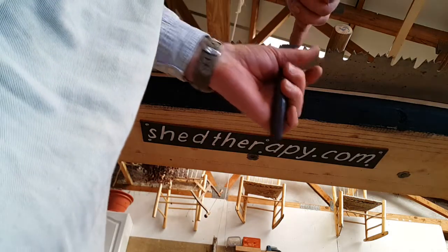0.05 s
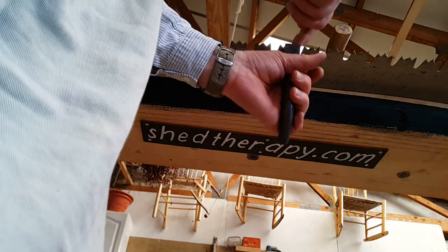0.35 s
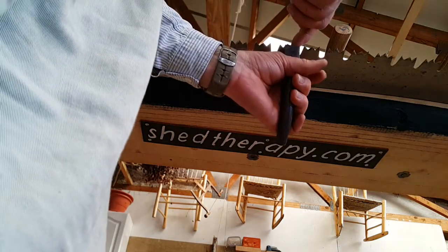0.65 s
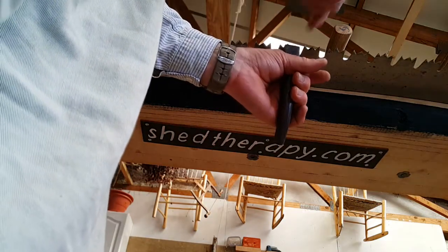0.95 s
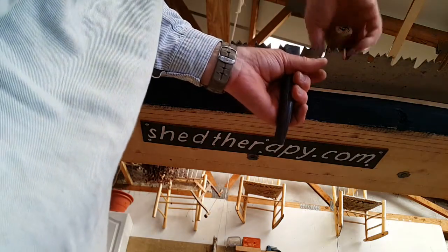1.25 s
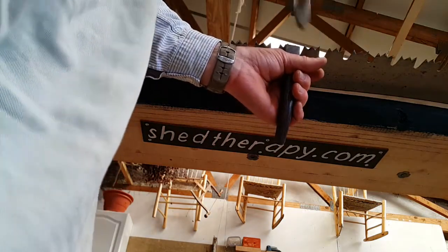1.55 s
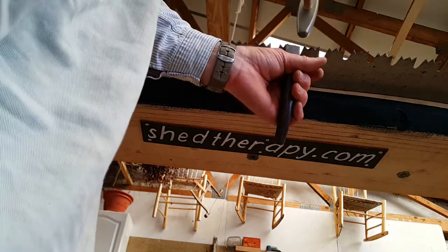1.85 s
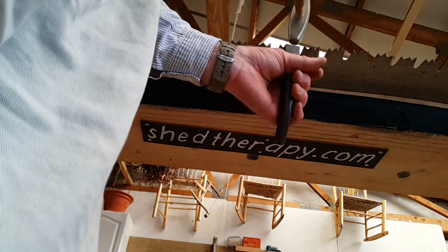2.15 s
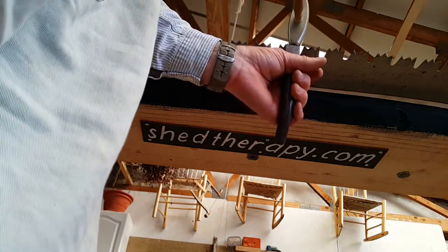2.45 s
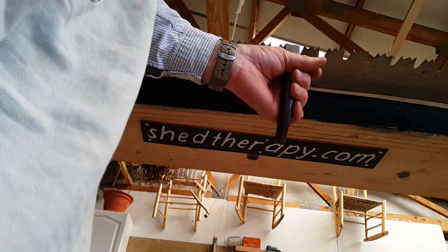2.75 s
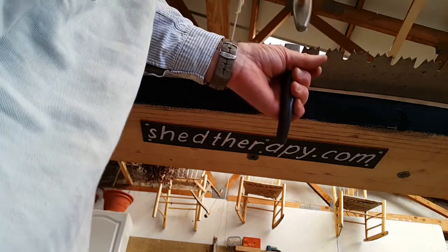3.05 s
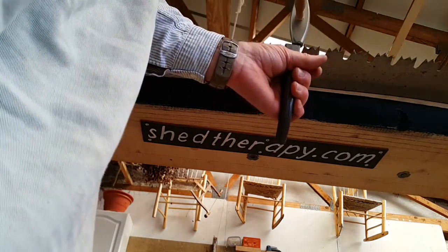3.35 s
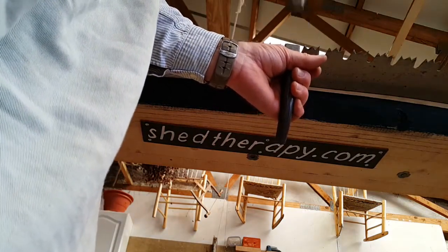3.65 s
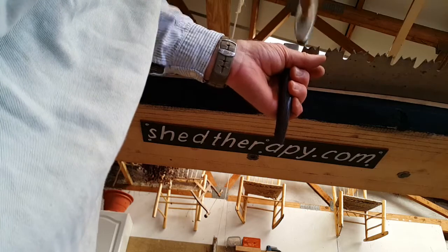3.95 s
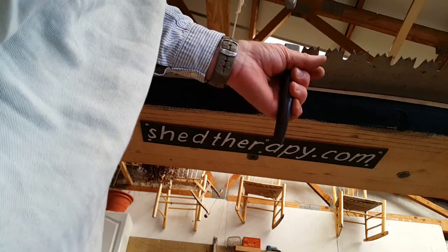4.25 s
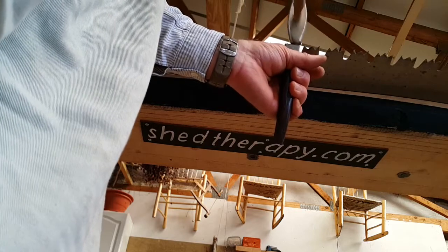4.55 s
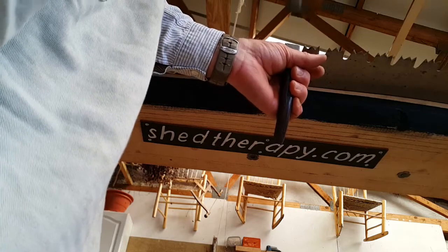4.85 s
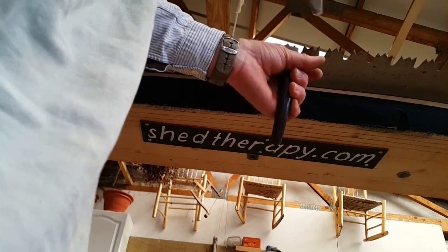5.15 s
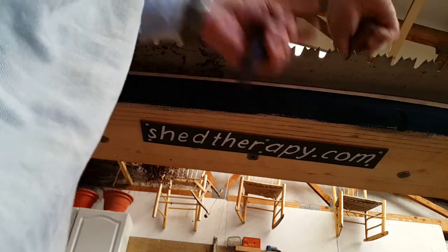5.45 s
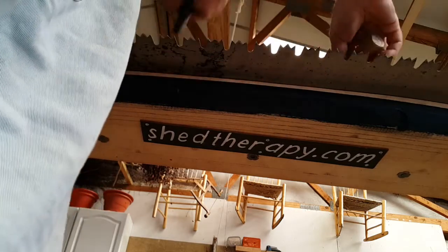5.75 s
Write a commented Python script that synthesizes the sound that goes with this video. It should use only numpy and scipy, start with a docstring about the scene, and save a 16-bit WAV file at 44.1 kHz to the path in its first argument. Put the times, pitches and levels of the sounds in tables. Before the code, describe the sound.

In a wooden shed, a few light clicks and knocks come from a big saw blade clamped in a wooden vice. A small hammer then strikes its teeth six times, about twice a second, each a sharp clack with a brief steel ping and a low knock. Finally an iron tool clonks onto a plank. The sound is close, with a short room echo and a faint outdoor hush.

```python
"""In a shed, the teeth of a big saw are being set (bent sideways) in a wooden vice. An iron is held
behind the blade while a small hammer feels for a tooth, then strikes and bounces: the blade clacks,
the steel pings, the vice knocks and the bench thuds. At the end the iron is put down on a plank.
The rafters answer; a sleeve rustles and a far dove coos over the outdoor air. The first hard blow
makes the microphone's automatic volume control turn everything down."""
import sys
import numpy as np
from scipy import signal
from scipy.fft import rfft, irfft, next_fast_len
from scipy.io import wavfile
from scipy.ndimage import uniform_filter1d, minimum_filter1d

SR = 44100
rng = np.random.default_rng(int(sys.argv[2]) if len(sys.argv) > 2 else 0)


def generate_wav(signal):
    """Clip the signal to [-1, 1] and save it as 16-bit WAV at the path in sys.argv[1]."""
    frames = np.transpose(np.atleast_2d(signal))
    scaled = np.clip(frames, -1, 1) * 32767
    pcm = np.round(scaled).astype(np.int16)
    wavfile.write(sys.argv[1], SR, pcm)


N = 260631
T = np.arange(SR // 2) / SR  # seconds since a short sound began

# fingers and hammer feel for a tooth: t/s, clack level/dB, brightness f/Hz, knock level/dB
LIGHT_TOUCHES = [(0.4538, -6, 6960, 6.5), (0.6099, -11.5, 2780, 5.5), (1.274, -16, 1980, -10),
                 (1.372, -14, 1500, 8.5), (1.393, -18.5, 7200, 7.5), (1.539, -13, 930, 10),
                 (1.551, -10.5, 1180, 2.5)]
# the hammer strikes and bounces once: t/s, force level/dB, brightness f/Hz, ping level/dB,
# thud level/dB, wait for the bounce t/s, bounce level/dB compared with the blow
HAMMER_BLOWS = [(2.477, 15, 2500, 2.5, -4.5, 0.016, -19.5), (3.0428, 37, 15000, 45, 38.5, 0.0475, -10),
                (3.445, 16.5, 4200, 25.5, 6.5, 0.026, -17), (4.066, 30, 9000, 40.5, 13, 0.036, -3.5),
                (4.6167, 25, 7640, 26.5, 4, 0.023, -14), (5.0756, 31, 12520, 40, 32.5, 0.0412, -8)]
# how much louder the saw is on the left than on the right: f/Hz, level/dB
SAW_BALANCE = [(100, 1), (300, 1.5), (1000, -3.5), (2200, 2), (4300, -4), (8000, -3.5), (13000, -1.5)]
def hammer_on_saw():
    """Light touches, then bouncing blows: with more force the steel clack outgrows the wooden knock."""
    out = np.zeros((2, N))
    firm_force_db, firm_knock_db = 30, 26.5
    knock_at = lambda force_db: firm_knock_db + 0.5 * (force_db - firm_force_db)
    for s, clack_db, bright_hz, knock_db in LIGHT_TOUCHES:
        add(out, s, contact(clack_db, bright_hz, knock_db))
    for s, force_db, bright_hz, ping_db, thud_db, wait, bounce_db in HAMMER_BLOWS:
        add(out, s, contact(force_db, bright_hz, knock_at(force_db), ping_db, thud_db))
        # the loose bounce only grazes the tooth's tip; it rings less and rocks the vice more
        back_db = force_db + bounce_db
        bounce = contact(back_db, bright_hz=11100, knock_db=knock_at(back_db) + 8.5,
                         ping_db=ping_db + bounce_db - 8.5, thud_db=thud_db + bounce_db - 9)
        add(out, s + wait, bounce)
    return filtered(out, lambda hz: amp(along(SAW_BALANCE, hz) * np.array([[.5], [-.5]])))


def contact(clack_db, bright_hz, knock_db, ping_db=-120, thud_db=-120):
    """One touch or hit on the saw. A softer contact lasts longer, so it leaves out the high notes."""
    soften = lambda hz: 1 / np.sqrt(1 + (hz / bright_hz) ** 4)
    clack = amp(clack_db) * blade_clack(soften)
    ping = amp(ping_db) * steel_ping(soften)
    knock = amp(knock_db) * vice_knock(soften)
    thud = amp(thud_db) * bench_thud()
    shed_share = 0.61  # the ping beams toward the listener, so only part of it fills the shed
    out = in_shed(clack + knock + thud + shed_share * ping, wet_db=-2.5)
    add(out, 0, (1 - shed_share) * ping)
    return out


# the tone colour of the blade's clack: f/Hz, level/dB
CLACK_COLOUR = [(60, -11.5), (250, -16.5), (600, -5.5), (900, -3.5), (1200, -4.5), (2100, -2), (3200, -5.5),
                (4500, -8), (6500, -0.5), (7500, -16.5), (8600, -8), (11000, -6.5), (13000, -11),
                (16000, -13)]
def blade_clack(soften):
    """The clamped blade shakes in countless ways at once and soon stops."""
    shake = amp(-0.5) * burst(t60=0.013) + amp(-3.0) * burst(t60=0.1)
    return struck(shake, lambda hz: amp(along(CLACK_COLOUR, hz)) * soften(hz))


# the notes of the hammer head and iron: f/Hz, level/dB, fade t/s
STEEL_NOTES = [(4236, 4, 0.05), (4378, 5, 0.045), (5530, -7, 0.08), (6465, -4, 0.05), (1875, -16, 0.02),
               (3490, -13.5, 0.04), (4560, -9, .025), (5680, -10, 0.04), (5950, -8, .04),
               (8480, -14, 0.025), (10500, -16, 0.015), (11630, -18, 0.015), (15240, -19, .08)]
def steel_ping(soften):
    """Hammer and iron ring; a soft hit dulls this more than any other part."""
    return struck(ring(STEEL_NOTES, scatter_db=3, spread=1.0), lambda hz: soften(hz) ** 2)


# the notes of the wooden vice with the blade in it: f/Hz, level/dB, fade t/s
VICE_NOTES = [(109.5, -5, 0.9), (160, -21.5, 0.068), (239.6, -2.5, 0.51), (273, -0.5, 0.16),
              (333.7, 3, 0.052), (355, -7, 0.36), (414, -14, .1), (497, -8, 0.053), (880, -10.5, .04),
              (1320, -19, 0.01)]
def vice_knock(soften):
    """The heavy vice takes a moment to get moving, then rings low."""
    onset = 1 - np.exp(-T / 0.00047)
    return struck(ring(VICE_NOTES, scatter_db=0, spread=0.5) * onset, soften)


# the tone colour of the bench's thud: f/Hz, level/dB
THUD_COLOUR = [(25, -28), (60, -2.5), (130, 4.5), (280, 6), (500, -13), (850, -0.5), (1300, -23.5),
               (4000, -42)]
def bench_thud():
    """A blow jolts the bench; the jolt arrives later and weaker on the left."""
    left_db, left_lag_s = -6, 0.0018
    jolt = T == 0
    left = amp(left_db) * np.roll(jolt, round(left_lag_s * SR))
    return struck(np.array([left, jolt], float), lambda hz: amp(along(THUD_COLOUR, hz)))


# the notes of the blade's free length: f/Hz, level/dB, fade t/s
BLADE_NOTES = [(1140, -10, 0.7), (1418, 0, 0.3), (2062, -6, 1.4), (2300, -7, 0.12)]
def blade_song():
    """The blade sings on faintly, about equally each time, as harder blows come with a firmer grip."""
    out = np.zeros((2, N))
    fade_out = np.minimum((T[-1] - T) / 0.042, 1)
    for s, *_ in HAMMER_BLOWS:
        add(out, s, amp(25) * ring(BLADE_NOTES, scatter_db=1.5, spread=0.22) * fade_out)
    return out


# steel slides over a tooth's tip: t/s, level/dB, f/Hz, length t/s
TOOTH_RUBS = [(0.752, -66, 6070, 0.066), (1.15, -67, 6150, 0.021), (1.368, -55.5, 6070, 0.012),
              (1.521, -67, 6100, 0.11), (2.482, -37, 6200, 0.0037), (2.695, -53, 3950, 0.012)]
def tooth_tinkles():
    """Light rubbing makes a tooth ring in one narrow band of pitch."""
    out = np.zeros((2, N))
    half_width_hz = 220
    for s, db, pitch_hz, length in TOOTH_RUBS:
        tone = noise(len(T), lambda hz: 1 / (1 + ((hz - pitch_hz) / half_width_hz) ** 2))
        age = 3 * T / length
        swell = age * np.exp(1 - age)
        add(out, s, in_shed(amp(db) * tone * swell, wet_db=-6))
    return out


# the iron lands and rocks: t/s, level/dB
IRON_BUMPS = [(5.6025, 37.5), (5.6075, 37), (5.6175, 30), (5.6275, 21.5)]
# the tone colour of the plank's clonk: f/Hz, level/dB
PLANK_COLOUR = [(40, -34.5), (110, -10.5), (170, -18), (250, -7), (400, -5.5), (550, -9.5), (850, -9.5),
                (980, -8), (1120, -22.5), (1400, -20.5), (2100, -20.5), (3500, -28), (6200, -31),
                (8000, -46.5), (15000, -60.5)]
# the plank's hollow notes: f/Hz, level/dB, fade t/s
HOLLOW_NOTES = [(897, -2, 0.021), (990, -5.5, 0.03)]
def iron_on_plank():
    """The iron clonks on a hollow plank and rocks to rest."""
    out = np.zeros((2, N))
    onset = 1 - np.exp(-T / 0.00024)
    for s, db in IRON_BUMPS:
        tap = 0.62 * (T == 0) + 0.51 * burst(t60=0.018)
        clonk = struck(tap, lambda hz: amp(along(PLANK_COLOUR, hz)))
        note = ring(HOLLOW_NOTES, scatter_db=4.5, spread=0.39) * onset
        add(out, s, in_shed(amp(db) * (clonk + note), wet_db=-2.0))
    return out


# how long the shed's echo takes to fall by 60 dB: f/Hz, fade t/s
ECHO_FADE = [(60, 0.23), (150, 1), (350, 0.45), (700, 0.6), (2000, 0.7), (4000, 0.66), (6000, 0.54),
             (8000, .45), (15000, 0.52)]
# the tone colour of that echo: f/Hz, level/dB
ECHO_COLOUR = [(60, -9.5), (150, -6), (330, 3.5), (900, -1), (2500, -2), (6000, -5), (14000, -11)]
def in_shed(x, wet_db):
    """A sound plus the shed's echo (wet_db sets its level), which builds fast and then dies away."""
    hz, t, hiss = signal.stft(stereo_noise(SR), SR, nperseg=256)
    t60 = along(ECHO_FADE, hz)[:, None]
    fade = amp(along(ECHO_COLOUR, hz)[:, None] - 60 * t / t60)
    even_energy = np.sqrt(2 * np.log(1000) / (t60 * SR))  # a longer fade adds no energy
    tail = signal.istft(hiss * fade * even_energy, SR, nperseg=256)[1][:, :SR]
    onset = 1 - np.exp(-np.arange(SR) / SR / 0.0059)
    out = amp(wet_db) * signal.fftconvolve(x, tail * onset, axes=1)
    add(out, 0, x)
    return out


# moves of the arm: middle t/s, level/dB, length t/s
ARM_MOVES = [(0.04, -69.5, 0.095), (0.216, -69.5, 0.21), (0.768, -62.5, 0.082), (1.26, -63.5, 0.18),
             (1.56, -67.5, 0.28), (1.725, -67, 0.16)]
# the tone colour of brushing cloth: f/Hz, level/dB
CLOTH_COLOUR = [(500, 4), (1500, -1), (3500, -2), (6000, -4), (8000, -16), (15000, -12)]
def sleeve():
    """Cloth noise swells and fades with each move of the arm."""
    t = np.arange(N) / SR
    swell = sum(amp(db) * np.exp(-2 * ((t - s) / length) ** 2) for s, db, length in ARM_MOVES)
    return swell * noise(N, lambda hz: amp(along(CLOTH_COLOUR, hz)))


# a far dove's calls: t/s, length t/s, level/dB
DOVE_COOS = [(2.25, 0.28, -59.5), (2.84, 0.28, -65)]
def dove():
    """Each coo is a pure tone whose pitch and level rise and fall together."""
    out = np.zeros((2, N))
    start_hz, rise_hz = 425, 89.5
    for s, length, db in DOVE_COOS:
        arch = np.sin(np.pi * np.minimum(T / length, 1))
        tone = np.sin(2 * np.pi * np.cumsum(start_hz + rise_hz * arch) / SR)
        add(out, s, amp(db) * arch * tone[None])
    return out


# the tone colour of the outdoor air: f/Hz, level/dB
AIR_COLOUR = [(15, -33.5), (25, -11), (70, -2.5), (166, -13), (212, -4), (277, -20), (309, -9.5),
              (463, -14.5), (714, -21.5), (863, -21), (962, -27.5), (1100, -26), (2610, -33), (3250, -33.5),
              (16000, -37)]
# how its low rumble rises and falls: t/s, level/dB
RUMBLE_LEVELS = [(0, 3), (0.9, 3.5), (1.5, -4.5), (3, 2.5)]
def outdoor_air():
    """A faint, steady hush whose rumble eases off and comes back."""
    air = amp(-59.5) * noise(N, lambda hz: amp(along(AIR_COLOUR, hz)))
    rumble_below_hz = 180
    rumble = filtered(air, lambda hz: 1 / (1 + (hz / rumble_below_hz) ** 4))
    rumble_db = np.interp(np.arange(N) / SR, *np.transpose(RUMBLE_LEVELS))
    return air - rumble + amp(rumble_db) * rumble


# how alike the left and right sides are: f/Hz, likeness (1 = the same)
SIDES_ALIKE = [(60, 0.31), (150, 1), (400, 0.8), (1500, 0.16), (4000, 0.37), (14000, 0.58)]
def stereo_noise(n):
    """An even hiss for two ears, most alike in the bass."""
    def shares(hz):
        angle = np.arccos(np.clip(along(SIDES_ALIKE, hz), -1, 1)) / 2
        return np.array([np.cos(angle), np.sin(angle)])
    mid, side = filtered(rng.standard_normal((2, n)), shares)
    return np.array([mid + side, mid - side])


def noise(n, colour):
    """Hiss with the given tone colour, at strength 1."""
    return unit(filtered(stereo_noise(n), colour))


def burst(t60):
    """Countless close notes fading together, by 60 dB in t60 seconds."""
    return unit(stereo_noise(len(T)) * amp(-60 * T / t60)) / np.sqrt(len(T))


def ring(notes, scatter_db, spread):
    """Notes that fall 60 dB in their fade time; spread puts left and right out of step."""
    hz, db, t60 = np.transpose(notes)[:, :, None]
    rate = np.log(1000) / t60
    size = 2 * rate / SR * amp(db + scatter_db * rng.standard_normal(hz.shape))
    phase = spread * rng.standard_normal((2,) + hz.shape)
    return (size * np.exp(-rate * T) * np.sin(2 * np.pi * hz * T + phase)).sum(axis=1)


def struck(x, colour, size=4096):
    """Give x a tone colour so that nothing sounds before the hit (a minimum-phase filter)."""
    gain = np.maximum(colour(np.fft.rfftfreq(size, 1 / SR)), 1e-6)
    cepstrum = irfft(np.log(gain))
    # move the part before the hit to after it
    cepstrum[1:size // 2] *= 2
    cepstrum[size // 2 + 1:] = 0
    response = irfft(np.exp(rfft(cepstrum)))
    return signal.fftconvolve(x, response[None], axes=1)[:, :x.shape[1]]


def filtered(x, response):
    """Multiply each frequency in x by response(hz)."""
    n = x.shape[-1]
    padded = next_fast_len(n + SR // 8)
    return irfft(rfft(x, padded) * response(np.fft.rfftfreq(padded, 1 / SR)), padded)[..., :n]


def along(points, hz):
    """Read between a table's rows on a pitch (log) scale."""
    row_hz, values = np.transpose(points)
    return np.interp(np.log(hz + 1), np.log(row_hz), values)


def amp(db):
    """Turn decibels into a multiplier."""
    return 10 ** (np.asarray(db) / 20)


def unit(x):
    """Scale x to an average strength (rms) of 1."""
    return x / np.sqrt(np.mean(x ** 2) + 1e-20)


def add(track, s, x):
    """Mix x into the track at s seconds."""
    part = track[:, round(s * SR):][:, :x.shape[1]]
    part += x[:, :part.shape[1]]


def scene():
    """The work lies a little to the right, so the sound reaches the left side later."""
    work = hammer_on_saw() + blade_song() + tooth_tinkles() + iron_on_plank()
    background = outdoor_air() + sleeve() + dove()
    lag_s = np.array([[0.00006], [0]])  # left, right
    return filtered(work + background, lambda hz: np.exp(-2j * np.pi * hz * lag_s))


def record(dry):
    """The volume control drops on a loud peak, sinks a little further and stays down."""
    threshold_db, most_cut_db = -4, 13.5
    instant_share, settle_s = 0.86, 0.18
    low_cut_hz, top_hz = 44, 16000  # the microphone's range
    peak_db = 20 * np.log10(np.abs(dry).max(axis=0) + 1e-9)
    needed_db = minimum_filter1d(np.clip(threshold_db - peak_db, -most_cut_db, 0), size=256)
    held_db = uniform_filter1d(np.minimum.accumulate(needed_db), size=128)
    keep = np.exp(-1 / (settle_s * SR))
    sinking_db = signal.lfilter([1 - keep], [1, -keep], held_db)
    x = dry * amp(instant_share * held_db + (1 - instant_share) * sinking_db)
    x = signal.sosfilt(signal.butter(2, low_cut_hz, "highpass", fs=SR, output="sos"), x)
    x = x / (1 + np.abs(x) ** 6) ** (1 / 6)  # round off peaks that still stick out
    return filtered(x, lambda hz: 1 / np.sqrt(1 + (hz / top_hz) ** 120))


dry = scene()
out = record(dry)
generate_wav(out)
```